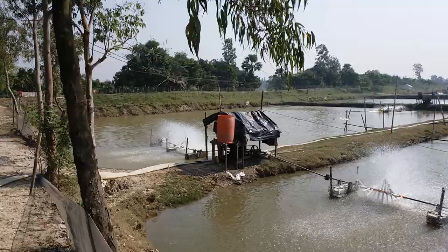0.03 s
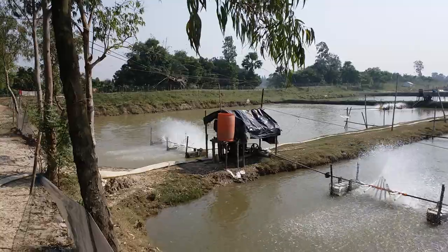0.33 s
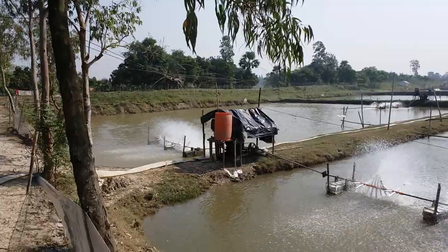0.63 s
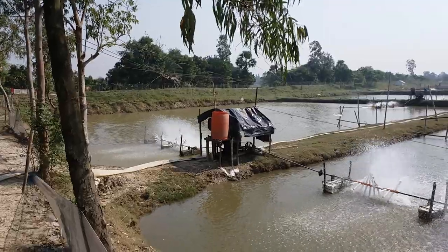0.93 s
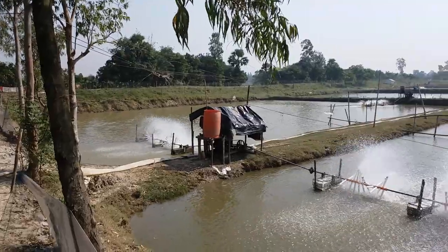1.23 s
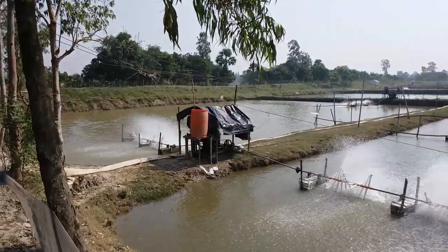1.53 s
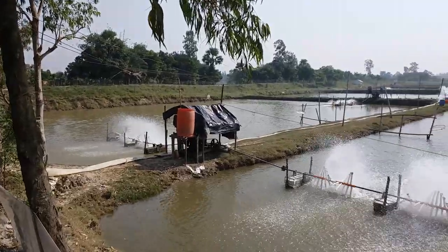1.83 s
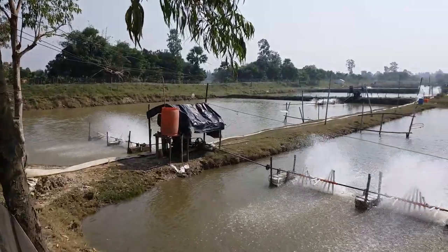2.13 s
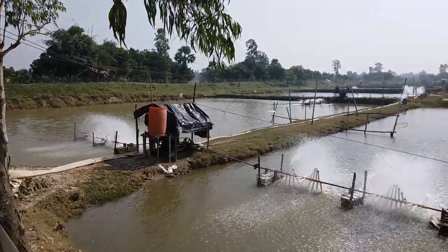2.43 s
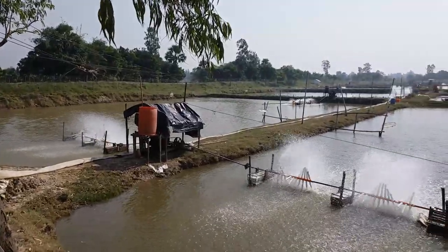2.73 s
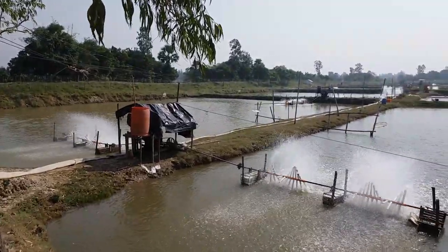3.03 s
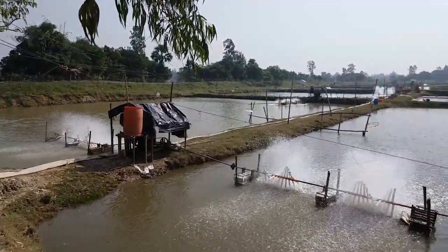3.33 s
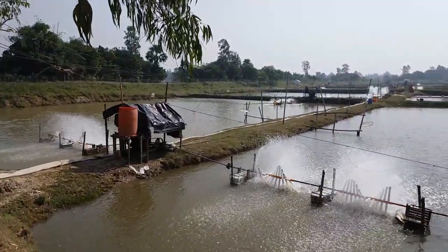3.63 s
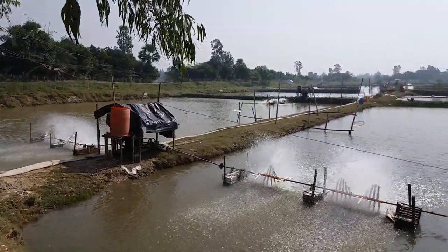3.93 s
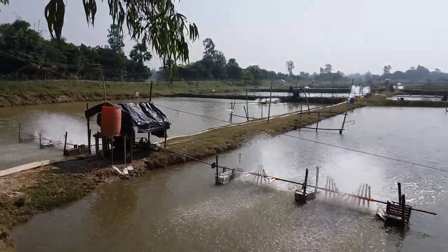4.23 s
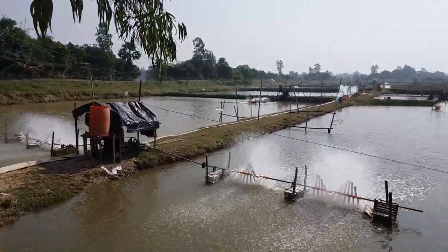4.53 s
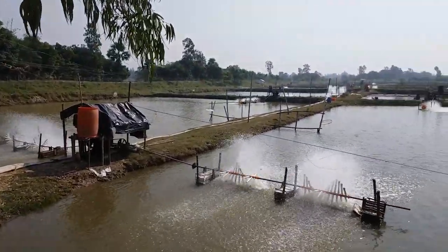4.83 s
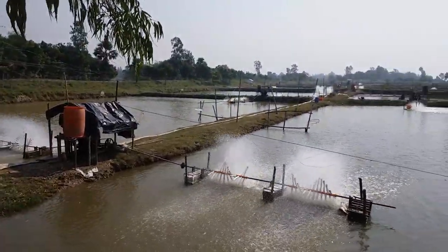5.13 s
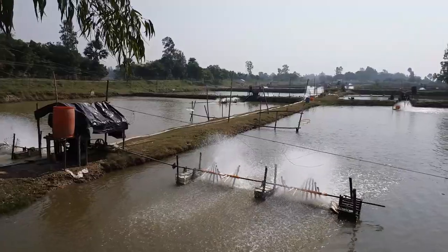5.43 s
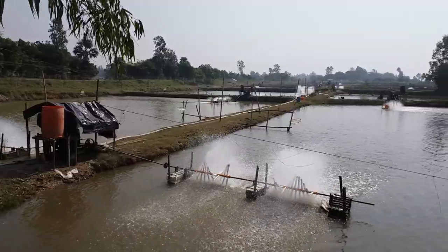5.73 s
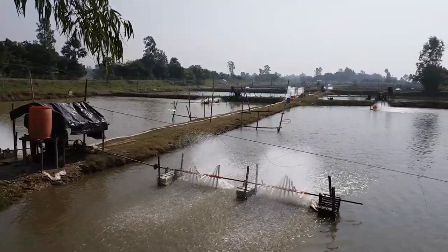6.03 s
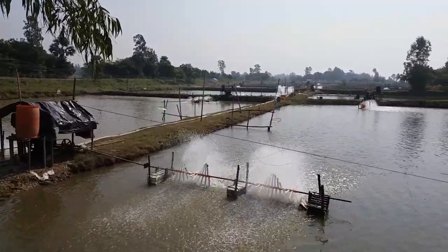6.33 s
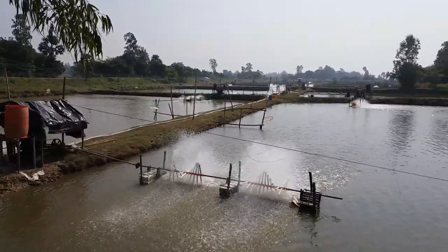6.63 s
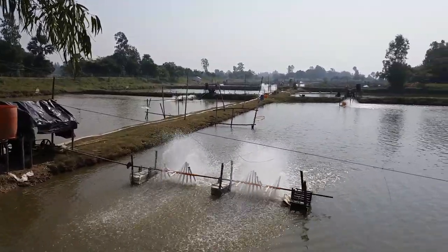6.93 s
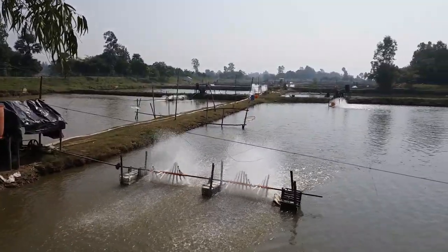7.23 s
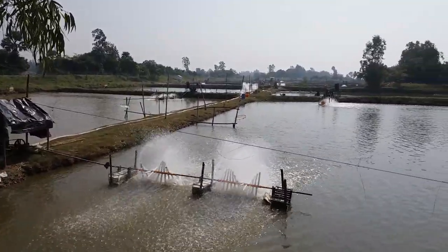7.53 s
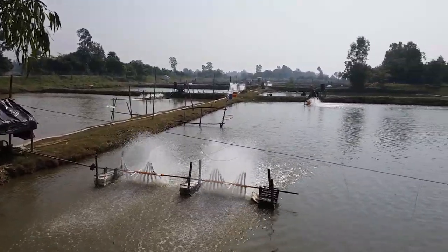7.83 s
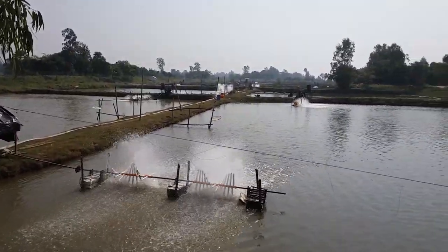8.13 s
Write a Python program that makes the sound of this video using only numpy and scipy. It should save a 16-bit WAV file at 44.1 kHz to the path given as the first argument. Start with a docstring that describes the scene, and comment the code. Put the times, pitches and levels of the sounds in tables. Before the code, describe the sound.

The sound fades in on a paddlewheel aerator beating pond water outdoors: a continuous gurgling churn, a hiss of spray that is brighter on the right, and a quick rhythmic clack and knock from the shaft. Underneath, several diesel engines chug deeply and drift against each other. The wheel moves from the right to straight ahead as the microphone turns, and occasional plops pop out of the splashing.

```python
"""Three slow single-cylinder diesels thud out of step beside fish ponds, driving paddlewheel aerators.
Each firing is an exhaust pulse trailed by turbulent gas; two engines also ring their intake ducts.
The nearest wheel clacks in its loose shaft joint every turn, slaps and churns the water and throws
a hissing spray. The sound fades in; the microphone turns towards the wheel, and its right port
rings in the treble."""
import sys
import numpy as np
from scipy import signal
from scipy.fft import rfft, irfft, next_fast_len
from scipy.io import wavfile
from scipy.ndimage import map_coordinates

SR = 44100
rng = np.random.default_rng(int(sys.argv[2]) if len(sys.argv) > 2 else 0)


def log_audio(samples):
    """Write samples as a 16-bit WAV file to the path given in sys.argv[1]."""
    # one column per channel
    frames = np.atleast_2d(samples).T
    # limit to full scale, then quantise
    limited = np.clip(frames, -1, 1)
    pcm = np.round(limited * 32767).astype(np.int16)
    wavfile.write(sys.argv[1], SR, pcm)


N = 365148

WHEEL_HZ = 3.552  # shaft turns a second
# deep thump of exhaust or shoved water (frequency [Hz], level [dB])
THUMP_SPECTRUM = [(28, -52), (38, -30), (55, -6), (78, 0.5), (110, -2.5), (145, -11), (240, -11),
                  (400, -20.5), (700, -27), (1500, -33), (5000, -78)]
# slapped water surface (frequency [Hz], level [dB])
SLAP_SPECTRUM = [(80, -17), (250, -1.5), (450, -4), (750, 3), (1100, -4.5), (1450, -12), (1800, -14),
                 (2250, -17), (3200, -27), (8000, -35)]


def amp(db):
    """Decibels to gain."""
    return 10 ** (np.asarray(db) / 20)


def unit(x):
    """Scale to rms 1."""
    return x / np.sqrt(np.mean(x ** 2) + 1e-20)


def along(points, hz):
    """Interpolate (frequency [Hz], value) points on a log axis."""
    point_hz, values = np.transpose(points)
    return np.interp(np.log(hz + 1), np.log(point_hz + 1), values)


def ramp(start_s, length_s):
    """Linear rise from 0 to 1."""
    return np.clip((np.arange(N) / SR - start_s) / length_s, 0, 1)


def wobble(rate_hz):
    """Smooth random curve, rate_hz knots a second."""
    knots = rng.standard_normal(N // 100)
    return map_coordinates(knots, [np.arange(N) * rate_hz / SR], mode="wrap")


def filtered(x, response):
    """Apply a complex frequency response."""
    size = 2 * next_fast_len((N + SR // 2) // 2)
    hz = np.fft.rfftfreq(size, 1 / SR)
    return irfft(rfft(x, size) * response(hz), size)[..., :N]


def coloured(x, spectrum):
    """Minimum-phase filter shaped by (frequency [Hz], level [dB])."""
    def response(hz):
        cepstrum = irfft(np.log(amp(along(spectrum, hz))))
        half = len(cepstrum) // 2
        return np.exp(rfft(np.r_[cepstrum[0], 2 * cepstrum[1:half], np.zeros(half)]))
    return filtered(x, response)


def resonate(x, modes):
    """Parallel resonances of alternating sign (frequency [Hz], width [Hz], level [dB])."""
    def response(hz):
        return sum((-1) ** k * amp(db) * 1j * hz * width / (centre ** 2 - hz ** 2 + 1j * hz * width)
                   for k, (centre, width, db) in enumerate(modes))
    return filtered(x, response)


def beats(rate_hz, first_s, scatter_db):
    """One impulse per cycle of a governed machine, scattered in time and strength."""
    count = int(rate_hz * N / SR) + 1
    jitter, strength = rng.standard_normal((count, 2)).T
    times_s = first_s + np.arange(count) / rate_hz + 0.0005 * jitter
    onsets = np.abs(np.round(times_s * SR).astype(int))
    return np.bincount(onsets, amp(scatter_db * strength), N)[:N]


def burst(train, t60_s):
    """Decaying noise after each impulse, rms 1."""
    envelope = signal.lfilter([1], [1, -amp(-60 / (t60_s * SR))], train)
    return unit(envelope * rng.standard_normal(N))


def puffs(train, rough, t60_s):
    """Pulses, each trailed by noise."""
    return unit(train) + rough * burst(train, t60_s)


def bubbles(count, pitch_hz, spread, cycles, size_db):
    """Randomly timed damped sines, pitch rising as they die, rms 1."""
    onsets = rng.integers(0, N, count)[:, None]
    hz = np.clip(pitch_hz * np.exp(spread * rng.standard_normal((count, 1))), 100, SR / 3)
    size = amp(size_db * np.minimum(rng.exponential(size=(count, 1)), 4))
    n = np.arange(int(2 * cycles * SR / pitch_hz))
    periods = hz * n / SR
    age = periods / cycles
    envelope = size * amp(-60 * age) * (1 - np.exp(-2 * periods))
    ring = envelope * np.sin(2 * np.pi * periods * (1 + age / 10))
    return unit(np.bincount((onsets + n).ravel(), ring.ravel(), N)[:N])


def stereo_noise(spectrum, coherence, centre=0):
    """Noise of given left-right coherence, rms 1; centre feeds both sides."""
    def response(hz):
        angle = np.arccos(np.clip(along(coherence, hz), -1, 1)) / 2
        return amp(along(spectrum, hz)) * [np.cos(angle), np.sin(angle)]
    pair = rng.standard_normal((2, N))
    pair[0] += centre
    mid, side = filtered(pair, response)
    return unit(np.array([mid + side, mid - side]))


def plops():
    """Big air pockets collapse: a ringing bubble and a short splash each."""
    # (time [s], peak [dB], pitch [Hz])
    pockets = [(2.104, -25, 750), (4.328, -14.2, 920), (7.201, -21.5, 980), (7.684, -16, 810)]
    out = np.zeros(N + SR)
    t = np.arange(SR // 10) / SR
    envelope = amp(-60 * t / 0.036) * (1 - np.exp(-t / 0.0022))
    for start_s, peak_db, hz in pockets:
        ring = np.sin(2 * np.pi * hz * t * (1 + 2.3 * t))
        splash = unit(coloured(rng.standard_normal(N), SLAP_SPECTRUM)[:len(t)])
        plop = envelope * (ring + 0.5 * splash)
        out[round(start_s * SR):][:len(t)] += amp(peak_db) * plop / np.abs(plop).max()
    return out[:N]


def paddles():
    """Blades slap the surface in turn; once a turn the deepest shoves the water with a thump."""
    blades = 6
    slaps = burst(beats(blades * WHEEL_HZ, first_s=0.004, scatter_db=3.5), t60_s=0.06)
    shove = burst(beats(WHEEL_HZ, first_s=0.276, scatter_db=0.5), t60_s=0.053)
    return (amp(-48.5) * unit(coloured(slaps, SLAP_SPECTRUM))
            + amp(-47) * unit(coloured(shove, THUMP_SPECTRUM)))


def shaft():
    """Each turn the loose joint takes up with a clack and rattle, then knocks as it lets go."""
    # shaft modes at take-up and let-go (frequency [Hz], width [Hz], level [dB])
    clack_modes = [(691, 28, 3), (767, 41, -4), (850, 38, -21), (1054, 24, -7.5), (1273, 42, -3.5),
                   (1350, 46, -13), (1630, 48, -13), (2007, 53, -6), (2210, 55, -10.5), (2240, 45, -8),
                   (2430, 34, -9.5)]
    knock_modes = [(254, 88, -1), (526, 52, 2.5), (615, 60, 0), (1430, 70, -9), (2320, 50, -8)]
    # loose parts (frequency [Hz], level [dB])
    rattle_spectrum = [(300, -13), (750, 1), (1400, -3.5), (1780, -13.5), (2200, 1), (2600, -4.5),
                       (3300, -27), (8000, -40)]
    # unusually soft or hard catches (time [s], level change [dB])
    odd_turns = [(0.761, -9), (1.04, 5.5), (1.6, 4)]
    t = np.arange(N) / SR
    odd_db = sum(db * (np.abs(t - time_s) < 0.5 / WHEEL_HZ) for time_s, db in odd_turns)
    clack_db = -41.3 - 6 * ramp(start_s=4.1, length_s=1.6) + odd_db
    take_up = beats(WHEEL_HZ, first_s=0.194, scatter_db=0)
    let_go = beats(WHEEL_HZ, first_s=0.254, scatter_db=1.3)
    ring = unit(resonate(puffs(take_up, rough=0.87, t60_s=0.051), clack_modes))
    rattle = unit(coloured(burst(take_up, t60_s=0.1), rattle_spectrum))
    knock = unit(resonate(puffs(let_go, rough=0.5, t60_s=0.05), knock_modes))
    return amp(clack_db) * unit(ring + rattle) + amp(-46.5) * knock


def falling_water():
    """Heavy drops patter into the pond under hissing spray, independent left and right."""
    # heavy drops, fine spray (frequency [Hz], level [dB])
    splash_spectrum = [(300, -5.5), (700, -1.5), (1100, -5.5), (1450, 3), (1800, -3), (2300, 2),
                       (3000, -2.5), (5000, -14), (12000, -40)]
    spray_spectrum = [(1000, -18), (2800, -1.5), (4000, 0.5), (6000, -1), (7500, -3.5), (9000, -7.5),
                      (10500, -11), (12000, -13.5), (15500, -15)]
    drops = np.array([bubbles(9000, pitch_hz=1816, spread=0.47, cycles=5.5, size_db=3.5)
                      for _ in range(2)])
    droplets = np.array([bubbles(25000, pitch_hz=9770, spread=0.35, cycles=2.5, size_db=2.5)
                         for _ in range(2)])
    patter = rng.standard_normal((2, N)) + 0.38 * drops
    hiss = rng.standard_normal((2, N)) + 0.6 * droplets
    splash = unit(filtered(patter, lambda hz: amp(along(splash_spectrum, hz))))
    spray = unit(filtered(hiss, lambda hz: amp(along(spray_spectrum, hz))))
    rise_db = 0.3837 * np.arange(N) / SR  # microphone turning towards the wheel
    heavy_sheet_db = 0.8 * (ramp(5.98, 0.085) - ramp(6.415, 0.085))
    uneven_sheets_db = 0.31 * wobble(14) + 0.57 * wobble(70)
    return amp(-41 + rise_db + heavy_sheet_db + uneven_sheets_db) * (splash + spray)


def churn():
    """Air beaten under the surface gurgles as a crowd of bubbles."""
    # churned water (frequency [Hz], level [dB])
    spectrum = [(100, -36), (250, 0), (330, 0.5), (440, -9), (540, -.5), (630, -3), (760, 2), (1000, -3),
                (1450, -7.5), (1800, -10.5), (2300, -8), (4000, -25), (9000, -60)]
    # left-right likeness (frequency [Hz], coherence [0-1])
    coherence = [(200, 0.7), (650, 0.92), (1000, 0.8), (1800, 0.43), (3500, 0)]
    gurgle = bubbles(2200, pitch_hz=724, spread=0.492, cycles=14, size_db=3.5)
    return amp(-36 + 0.6 * wobble(12)) * stereo_noise(spectrum, coherence, centre=0.18 * gurgle)


def bank_rumble():
    """Diffuse engine sound returned by the banks."""
    # rumble (frequency [Hz], level [dB])
    spectrum = [(20, -46), (32, -36), (42, -17), (55, -8.5), (74, -2), (86, 2), (100, -0.5), (140, -0.5),
                (200, -5), (310, -4), (420, -12.5), (700, -27.5), (2000, -65)]
    # left-right likeness (frequency [Hz], coherence [0-1])
    coherence = [(30, 0.92), (70, 0.96), (150, 0.98), (300, 0.79)]
    return amp(-36.5) * stereo_noise(spectrum, coherence)


def duct_engine(firing_hz, first_s, intake_lag_s, duct, exhaust_db, intake_db):
    """A deep exhaust thump, then the intake gulps and rings its duct."""
    exhaust = puffs(beats(firing_hz, first_s, scatter_db=2), rough=0.58, t60_s=0.089)
    intake = puffs(beats(firing_hz, first_s + intake_lag_s, scatter_db=0.5), rough=0.31, t60_s=0.023)
    return (amp(exhaust_db) * unit(coloured(-exhaust, THUMP_SPECTRUM))
            + amp(intake_db) * unit(resonate(intake, duct)))


def near_engine():
    """A short, hard exhaust bark per firing: pressure pulse, then turbulent gas."""
    # exhaust (frequency [Hz], level [dB])
    spectrum = [(25, -53), (45, -36), (70, -7), (90, -2.5), (120, 0.5), (150, -3), (210, 0.5), (275, -4),
                (340, -16), (430, -25), (800, -17.5), (1300, -32.5), (2500, -34), (6000, -65)]
    firings = beats(rate_hz=8.8815, first_s=0.0785, scatter_db=1.7)
    return amp(-36) * unit(coloured(puffs(firings, rough=0.32, t60_s=0.1), spectrum))


def engines():
    """Three diesels at unequal rates drift through one another over their rumble."""
    # intake duct modes (frequency [Hz], width [Hz], level [dB])
    deep_duct = [(238.7, 22.5, 2), (300.5, 20.4, 1), (533.4, 30, -1)]
    far_duct = [(170, 104, -7.5), (310, 44, -1.5), (585, 86, -16)]
    deep = duct_engine(firing_hz=9.693, first_s=0.004, intake_lag_s=0.026, duct=deep_duct,
                       exhaust_db=-37.5, intake_db=-40.5)
    far = duct_engine(firing_hz=9.431, first_s=0.012, intake_lag_s=0.028, duct=far_duct,
                      exhaust_db=-47, intake_db=-41)
    return near_engine() + deep + far + bank_rumble()


def scene():
    """Engines centred; the microphone's turn brings the wheel from the right to straight ahead."""
    # wheel's lag at the left port (time [s], delay [s])
    left_lag = [(0.5, .00019), (4.5, .00014), (6, .00005), (7.5, 0)]
    # wheel's colour when faced (frequency [Hz], gain [dB])
    facing_colour = [(300, -0.5), (550, 0.5), (1500, 0.6), (2200, -0.6), (3000, -2), (3800, -0.5),
                     (5000, .8), (6400, -2.2), (8000, 0.5)]
    t = np.arange(N) / SR
    delay_s = np.interp(t, *np.transpose(left_lag))
    facing = 1 - delay_s / delay_s.max()
    left, right = churn() + paddles() + shaft() + plops()
    aslant = np.array([np.interp(t - delay_s, t, left), right]) + falling_water()
    ahead = filtered(aslant, lambda hz: amp(along(facing_colour, hz)))
    return (1 - facing) * aslant + facing * ahead + engines()


def record(dry):
    """Microphone port colour, fade-in and band limit."""
    # port responses (frequency [Hz], gain [dB])
    left_port = [(1800, 0.5), (2900, -2.5), (3900, -5), (5100, -9), (6000, -2.5), (7300, -4.5), (9000, -5),
                 (10500, -1), (12000, -4.5), (15500, -3.5)]
    right_port = [(1500, 0.65), (2300, 2), (2900, 1.9), (3400, 9.2), (3900, 15.2), (4400, 18.06),
                  (4800, 11.95), (5300, 5.2), (6000, 2.3), (7300, 6.25), (9000, 3.7), (15500, 0.5)]
    heard = filtered(dry, lambda hz: amp([along(left_port, hz), along(right_port, hz)]))
    fade_in = ramp(start_s=0.379, length_s=0.305)
    return filtered(amp(-0.44) * heard * fade_in, lambda hz: hz < 15750)


dry = scene()
out = record(dry)
log_audio(out)
```